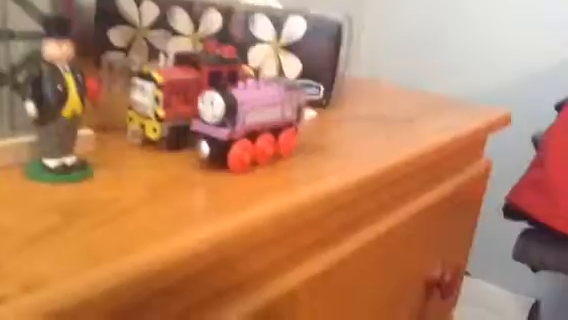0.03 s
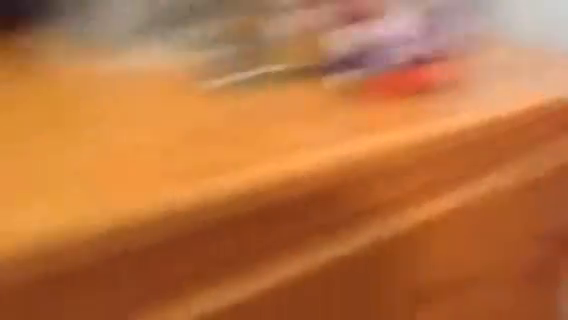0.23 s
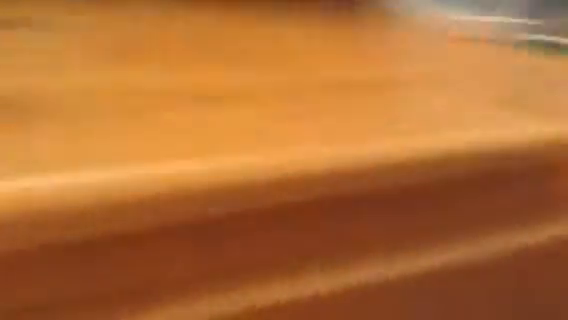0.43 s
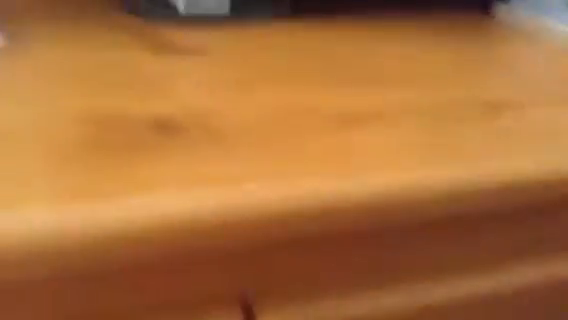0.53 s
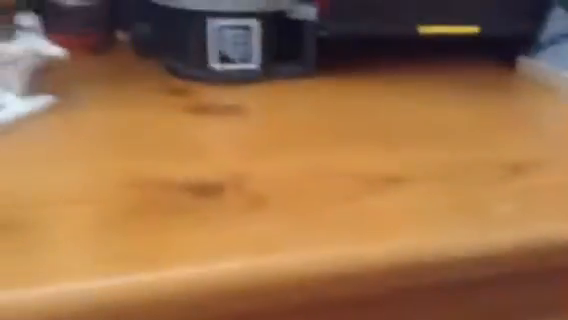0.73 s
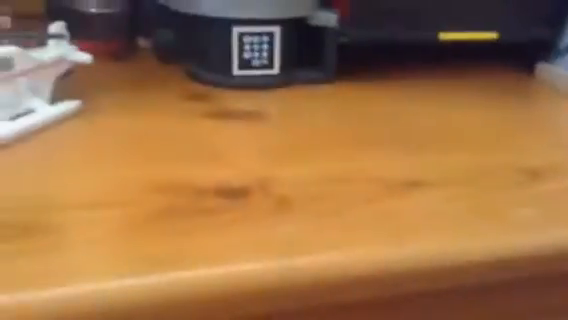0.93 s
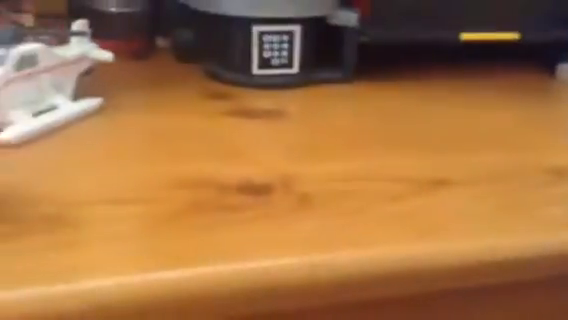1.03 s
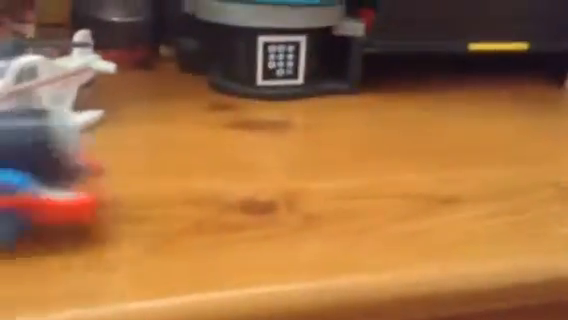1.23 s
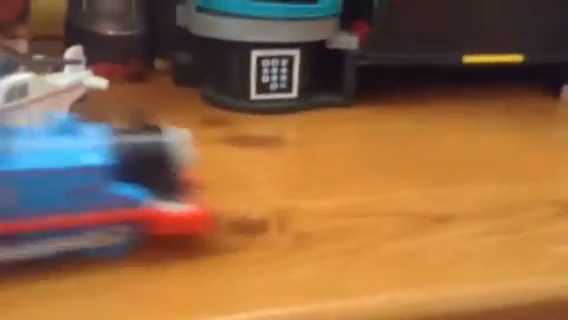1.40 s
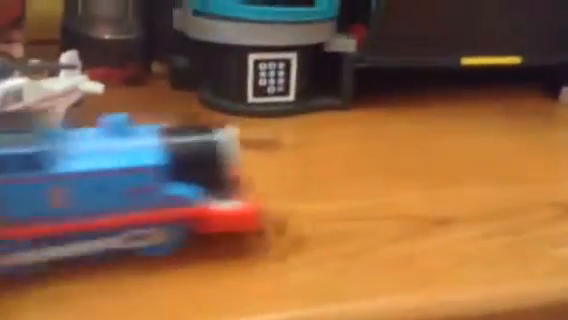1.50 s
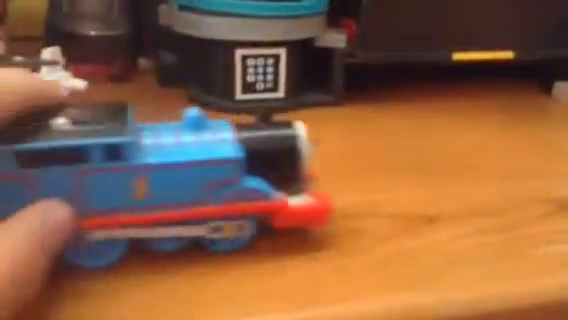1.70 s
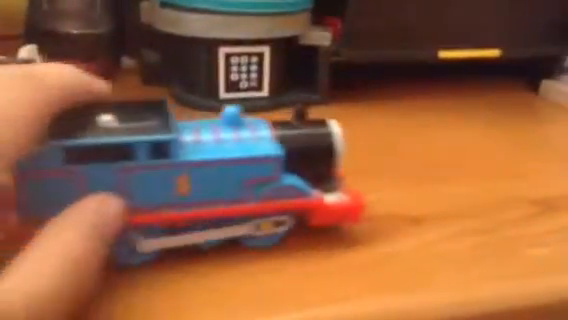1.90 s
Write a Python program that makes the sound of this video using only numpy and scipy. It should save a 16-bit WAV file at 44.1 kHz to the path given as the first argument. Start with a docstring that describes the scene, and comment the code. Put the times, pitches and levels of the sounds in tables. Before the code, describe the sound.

A plastic toy engine is pushed briefly along a wooden dresser, wheels rumbling softly and loose parts clicking, then stops. Before it, fingers knock and rub right at the microphone in a small room.

```python
"""Toy engine on a dresser

Fingers bump and rub the case of a hand-held camera in a small room; the case rings and snaps as it flexes.
Then a plastic toy engine is pushed along a wooden dresser: its wheels rumble on the top and chatter
in the hollow shell, loose parts clack, the rods tick, the chassis thuds, and it comes to rest."""
import sys
import numpy as np
from scipy import signal
from scipy.fft import rfft, irfft, next_fast_len
from scipy.io import wavfile
from scipy.ndimage import uniform_filter1d

SR = 44100
rng = np.random.default_rng(int(sys.argv[2]) if len(sys.argv) > 2 else 0)


def master_out(mix):
    """Clip the mix to full scale and print it as 16-bit PCM to the path in sys.argv[1]."""
    frames = np.transpose(np.atleast_2d(mix))
    ceiling = np.clip(frames, -1, 1)
    pcm = np.round(ceiling * 32767).astype(np.int16)
    wavfile.write(sys.argv[1], SR, pcm)


N = 85995

# body of the toy's hollow shell: freq_hz, gain_db
SHELL_COLOUR = [(50, -43), (200, -45), (600, -5.5), (950, 0), (1300, 7.5), (1700, 8.5), (2150, 5),
                (2950, 6.5), (3700, -1.5), (4700, -15), (6000, -10), (8000, -19.5), (12500, -31),
                (14000, -47)]
# bright hiss of rod ticks and grit: freq_hz, gain_db
TICK_COLOUR = [(200, -32), (2000, 2), (6000, 9), (12000, -3), (13500, -3), (15000, 4)]
KNOCK_RISE_S = .0014


def wheels():
    """Rolling wheels rumble the wooden top, chatter in the shell and tick over specks of grit."""
    push = [(.945, -57, -47), (.985, -52.5, -55), (1.03, -56.5, -59), (1.114, -45.5, -62),
            (1.19, -60, -59.5), (1.265, -51.5, -62), (1.29, -61, -62.5), (1.33, -51.5, -57.5),
            (1.42, -52.5, -55.5), (1.55, -52.5, -58.5), (1.58, -46, -62), (1.635, -50, -58.5),
            (1.68, -45, -51.5), (1.76, -59, -64.5), (1.84, -81, -68.5), (1.95, -74, -77)]  # faders of the push: time_s, rumble_db, chatter_db
    wood_colour = [(40, -25), (70, -27), (100, -7), (140, -7.5), (190, 7.5), (220, -9), (259, 5), (300, -9),
                   (346, -0.5), (420, -14), (600, -14), (900, -27), (2000, -43)]  # body of the dresser top: freq_hz, gain_db
    start_s, fade_in_s, impacts_per_s, specks_per_s = .97, .0043, 1000, 80
    rumble_db, chatter_db = curves(push)
    moving = np.clip((np.arange(N) / SR - start_s) / fade_in_s, 0, 1)
    impacts = (rng.random(N) < impacts_per_s / SR) * rng.choice([-1, 1], N)
    impacts = impacts * amp(-np.minimum(rng.exponential(size=N), 3))
    contact = unit(impacts) + .5 * rng.standard_normal(N)
    chatter = even(patchy(coloured(contact, SHELL_COLOUR), depth_db=3), size=600)
    specks = (rng.random(N) < specks_per_s / SR) * rng.random(N)
    speck_envelope = signal.fftconvolve(specks, decay(t60=.0083))[:N]
    grit = unit(speck_envelope * noise(TICK_COLOUR))
    rumble = even(noise(wood_colour), size=900)
    return moving * (amp(rumble_db - 1) * rumble + amp(chatter_db + 3.5) * (chatter + amp(-13) * grit))


def loose_parts():
    """Loose parts clack in the shell, which answers hardest near each clack's own pitch."""
    clacks = [(0.951, -42, -9, 1950), (.964, -42.5, -26, 2920), (0.975, -46, -24, 2700),
              (1.0, -40, -0.5, 1890), (1.082, -32, -8, 3020), (1.089, -31, -10, 2900),
              (1.1105, -26.5, -1, 3080), (1.115, -28, -9, 1630), (1.128, -38, -12, 2940),
              (1.228, -39.5, -25, 1550), (1.248, -40.5, 3, 3040), (1.3069, -38.5, 8, 4320),
              (1.32, -37.5, 5, 3020), (1.449, -44, -6, 2850), (1.473, -46.5, 7, 2980),
              (1.516, -32.5, 4.5, 2950), (1.519, -38.5, 5.5, 2960), (1.531, -35.5, -15, 1360),
              (1.537, -36.5, -6, 3480), (1.556, -37.5, -11, 2200), (1.611, -40.5, -24, 1350),
              (1.651, -27.5, -37, 3350), (1.658, -33, -6, 2460), (1.683, -35.5, -4, 2460),
              (1.9035, -49, -1, 3250)]  # parts striking: start_s, level_db, ring_share_db, pitch_hz
    shell_modes = [(1420, -8, 0.033), (1727, -5.5, 0.035), (2487, -15, 0.07), (2740, -1.5, 0.018),
                   (2982, 4.5, 0.023), (3566, -9, 0.035), (4027, -2, 0.016)]  # ring of the shell: pitch_hz, level_db, t60_s
    noise_focus_db, mode_focus_db = 9.5, 5
    grid_hz = np.geomspace(100, 16000, 120)
    out = np.zeros(N)
    for start_s, db, ring_db, hz in clacks:
        colour = np.c_[grid_hz, along(SHELL_COLOUR, grid_hz) + noise_focus_db * near(grid_hz, hz)]
        modes = [(f, level + mode_focus_db * near(f, hz), t60) for f, level, t60 in shell_modes]
        clack = burst(colour, t60=.049) + amp(ring_db) * ring(modes)
        add(out, start_s, amp(db) * attack(KNOCK_RISE_S) * clack)
    return out


def wheel_rods():
    """The rods tick: a dry puff of hiss with a short, high ring."""
    ticks = [(0.952, -50), (0.9984, -40.5), (1.0837, -22.5), (1.089, -21), (1.1125, -32.5), (1.12, -37.5),
             (1.173, -42.5), (1.242, -47), (1.39, -49), (1.463, -50), (1.555, -41.5), (1.653, -38),
             (1.696, -40)]  # rod strikes: start_s, level_db
    rod_modes = [(8930, 3, 0.02), (9580, 0, .014), (11300, 1, 0.013), (12650, 3, 0.013)]  # ring of the rods: pitch_hz, level_db, t60_s
    out = np.zeros(N)
    for start_s, db in ticks:
        tick = amp(-17.5) * ring(rod_modes) + amp(-12) * burst(TICK_COLOUR, t60=.033)
        add(out, start_s, amp(db) * tick)
    return out


def chassis():
    """The chassis drops on the wood with a dull thud."""
    drops = [(1.1105, -42.5), (1.651, -36.5), (1.681, -45)]  # landings: start_s, level_db
    thud_colour = [(40, -35), (120, -20), (250, 5), (420, 9.5), (650, 18), (1000, -13), (2000, -18)]  # plastic on wood: freq_hz, gain_db
    out = np.zeros(N)
    for start_s, db in drops:
        add(out, start_s, amp(db) * attack(KNOCK_RISE_S) * burst(thud_colour, t60=.076))
    return out


def finger_bumps():
    """Fingers knock the camera case into ringing; a softer contact gives a duller knock."""
    bumps = [(0.1509, -4, 3000), (0.1705, 1, 850), (0.2073, -4.5, 1530), (0.2329, -24.5, 3030),
             (0.2876, -2, 626), (0.3945, -10.5, 358), (0.4081, -7, 768), (0.5324, -14.5, 577),
             (.598, -6, 1680)]  # finger blows: start_s, strength_db, lowpass_hz
    case_modes = [(210, -26, 0.093), (282.6, -3.5, 0.0214), (470, -7, 0.014), (630, -11, 0.015),
                  (800, -23, 0.015), (994, 2, 0.0048), (1860, -32, 0.012), (3280, -25, 0.00534)]  # ring of the case: pitch_hz, level_db, t60_s
    out, t = np.zeros(N), hit_time()
    knock = sum(amp(db) * decay(t60) * np.cos(2 * np.pi * hz * t) for hz, db, t60 in case_modes)
    knock = amp(-15.5) * cut(knock, hz=215, kind="high", order=3)
    for start_s, db, lowpass_hz in bumps:
        add(out, start_s, amp(db) * cut(knock, lowpass_hz, "low", order=4))
    return out


def case_snaps():
    """The flexing case snaps: a sharp crack and a brief ring over a hollow thump."""
    snaps = [(0.1506, -13.5, 9300, -20, .83), (.206, -9.5, 7760, -7.5, 0.99),
             (0.5977, -24, 3180, -22.5, 0.803)]  # flexes: start_s, snap_db, lowpass_hz, thump_db, pitch_ratio
    snap_modes = [(1670, -4, 0.0064), (2167, 2, 0.0045), (3230, -2, 0.005), (4000, 3, 0.0038),
                  (4900, -9.5, 0.0041), (5850, -14, 0.016), (6640, -19, 0.0083), (8000, -8, 0.0049),
                  (10820, -7.5, 0.006), (13300, -5, 0.0039)]  # ring of the case wall: base_pitch_hz, level_db, t60_s
    crack_colour = [(250, -30), (1200, -2), (2100, 5.5), (3800, -1), (6000, -2), (10000, -5.5),
                    (15000, -3.5)]  # noise of the crack: freq_hz, gain_db
    thump_hz = 260.2
    out, t = np.zeros(N), hit_time()
    thump = attack(rise_s=.0089) ** 2 * decay(t60=.028) * np.sin(2 * np.pi * thump_hz * t)
    for start_s, db, lowpass_hz, thump_db, pitch_ratio in snaps:
        wall = sum((-1) ** k * amp(level) * decay(t60) * np.sin(2 * np.pi * pitch_ratio * hz * t)
                   for k, (hz, level, t60) in enumerate(snap_modes))
        crack = burst(crack_colour, t60=.0099)
        snap = (wall + amp(14.5) * crack / np.linalg.norm(crack)) * attack(rise_s=.00011)
        snap = cut(snap, lowpass_hz, "low", order=2)
        add(out, start_s, amp(db) * snap - amp(thump_db + 12.5) * thump)
    return out


def finger_rub():
    """A finger drags over the case with a low scuff."""
    drag = [(.225, -78), (.245, -48), (.262, -33.5), (.278, -33.5), (0.299, -28), (0.319, -35.5),
            (.355, -58), (.41, -64.5), (.465, -54), (.51, -82)]  # fader of the drag: time_s, level_db
    rub_colour = [(40, -71.5), (100, -35), (150, -11), (210, -6), (285, 10), (380, -9), (467, 4.5),
                  (560, -15.5), (780, -26), (1030, -19), (1300, -31), (3000, -43.5), (5000, -47.5),
                  (6300, -43), (8000, -54), (12000, -59)]  # skin on the case: freq_hz, gain_db
    return amp(curves(drag)[0]) * even(noise(rub_colour), size=400)


def hand_grip():
    """The grip creeps on the case with a faint, dark rustle."""
    creep = [(.11, -85), (.16, -60), (.37, -53), (.5, -59), (.65, -64), (.85, -62), (1.0, -68), (1.7, -85)]  # fader of the grip: time_s, level_db
    grip_colour = [(40, -47), (110, -19), (190, 9.5), (300, 8.5), (450, -2.5), (700, -1.5), (1100, -11),
                   (2500, -44)]  # hand on the case: freq_hz, gain_db
    return amp(curves(creep)[0]) * noise(grip_colour)


def room_reverb(x):
    """The small room returns a short, diffuse tail."""
    room_decay = [(200, 0.11), (2000, 0.24), (12000, 0.21)]  # reverb time: freq_hz, t60_s
    return amp(-10) * echo(x, room_decay, gap_s=.004, size=256)


def close_reflections(x):
    """The hand and furniture throw back a quick, dull reflection."""
    close_decay = [(200, 0.054), (1200, 0.052), (3000, 0.014), (6000, 0.015), (14000, 0.0059)]  # reflection decay: freq_hz, t60_s
    reflections = echo(x, close_decay, gap_s=.00194, size=64)
    return amp(-13.5) * cut(reflections, hz=2460, kind="low", order=2)


def room_tone():
    """A quiet, steady bed of air."""
    air_colour = [(25, -24), (60, -29), (100, -15), (140, -9), (195, -2), (290, -10), (450, -20),
                  (650, -16), (1000, -17), (2000, -18), (4150, -23.5), (15000, -27.5)]  # the still room: freq_hz, gain_db
    return amp(-62) * noise(air_colour)


def amp(db):
    return 10 ** (np.asarray(db) / 20)


def unit(x):
    return x / np.sqrt(np.mean(x ** 2) + 1e-20)


def along(points, hz):
    """Read (freq_hz, value) points on a log frequency axis."""
    freqs, values = np.transpose(points)
    return np.interp(np.log(hz + 1), np.log(freqs + 1), values)


def curves(rows):
    """One value per sample for each column after the time."""
    times, *columns = np.transpose(rows)
    return [np.interp(np.arange(N) / SR, times, column) for column in columns]


def coloured(x, colour):
    """EQ x by (freq_hz, gain_db) points, at rms 1."""
    size = next_fast_len(len(x) + SR // 8)
    gain = amp(along(colour, np.fft.rfftfreq(size, 1 / SR)))
    return unit(irfft(rfft(x, size) * gain, size)[:len(x)])


def cut(x, hz, kind, order):
    """Causal low-pass or high-pass."""
    return signal.sosfilt(signal.butter(order, hz, kind, fs=SR, output="sos"), x)


def noise(colour):
    return coloured(rng.standard_normal(N), colour)


def hit_time():
    """Seconds since a hit."""
    return np.arange(SR // 4) / SR


def attack(rise_s):
    return 1 - np.exp(-hit_time() / rise_s)


def decay(t60):
    return amp(-60 * hit_time() / t60)


def add(track, start_s, sound):
    part = track[round(start_s * SR):][:len(sound)]
    part += sound[:len(part)]


def ring(modes):
    """Modes struck at a random spot, so their levels and phases vary."""
    t = hit_time()
    return sum(amp(db + rng.normal(0, 3.1)) * decay(t60) * np.sin(2 * np.pi * (hz * t + rng.random()))
               for hz, db, t60 in modes)


def burst(colour, t60):
    """A dying puff of noise."""
    envelope = decay(t60)
    return noise(colour)[:len(envelope)] * envelope


def near(hz, centre_hz, octaves=.18):
    """A bell curve: 1 at the centre, falling to 0 either side."""
    return np.exp(-(np.log2(hz / centre_hz) / octaves) ** 2)


def patchy(x, depth_db):
    """The colour shifts from moment to moment as the contact moves."""
    spectra = signal.stft(x, nperseg=256)[2]
    patches = uniform_filter1d(rng.standard_normal(spectra.shape), size=3, axis=0)
    patches = unit(uniform_filter1d(patches, size=5, axis=1))
    return unit(signal.istft(spectra * amp(depth_db * patches), nperseg=256)[1][:N])


def even(x, size):
    """Level out chance swells over about size samples."""
    power = uniform_filter1d(uniform_filter1d(x ** 2, size), size)
    return x / np.sqrt(np.abs(power) + 1e-6)


def echo(x, t60s, gap_s, size):
    """A diffuse tail after a short gap; each frequency dies at its own speed."""
    hiss = rng.standard_normal(SR // 2)
    hz, t, spectra = signal.stft(hiss, SR, nperseg=size)
    fade = amp(-60 * t / along(t60s, hz)[:, None])
    tail = signal.istft(spectra * fade, SR, nperseg=size)[1][:len(hiss)]
    response = np.pad(tail / np.linalg.norm(tail), (round(gap_s * SR), 0))
    return signal.fftconvolve(x, response)[:N]


def scene():
    """The engine is out in the room; the hand is right at the microphone."""
    toy = wheels() + loose_parts() + wheel_rods() + chassis()
    hand = finger_bumps() + case_snaps() + finger_rub()
    return (toy + room_reverb(toy) + hand + close_reflections(hand) + hand_grip() + room_tone())[None]


def record(dry):
    """The small microphone loses the deep bass, and the camera keeps nothing above its band limit."""
    low_cut_hz, band_limit_hz = 72, 15400
    size = next_fast_len(N + SR // 2)
    thin = cut(dry, low_cut_hz, "high", order=2)
    in_band = np.fft.rfftfreq(size, 1 / SR) < band_limit_hz
    return irfft(rfft(thin, size) * in_band, size)[..., :N]


dry = scene()
out = record(dry)
master_out(out)
```